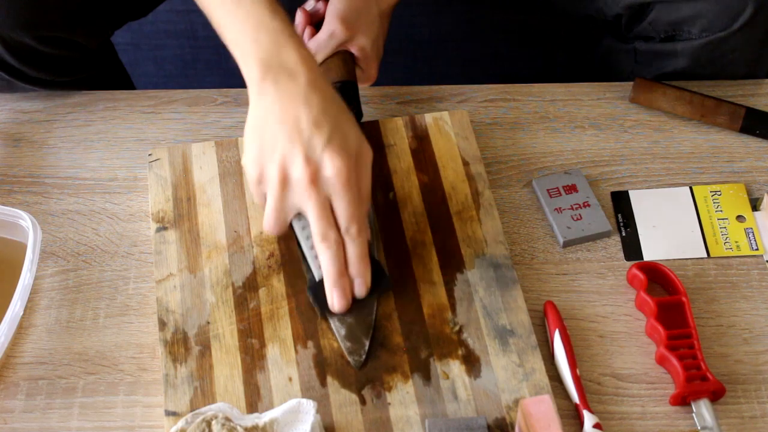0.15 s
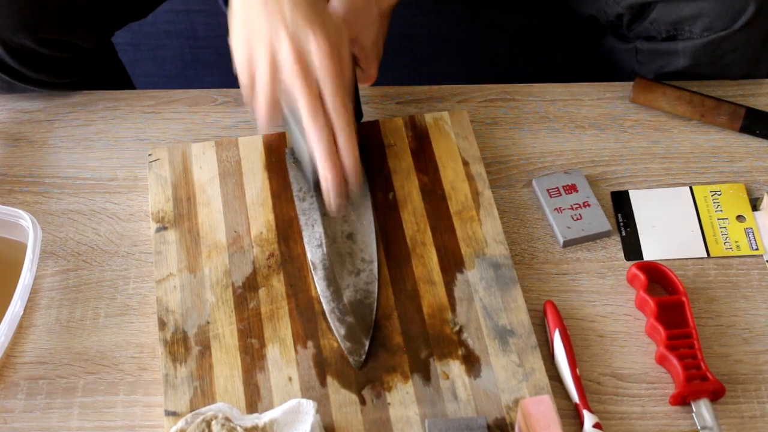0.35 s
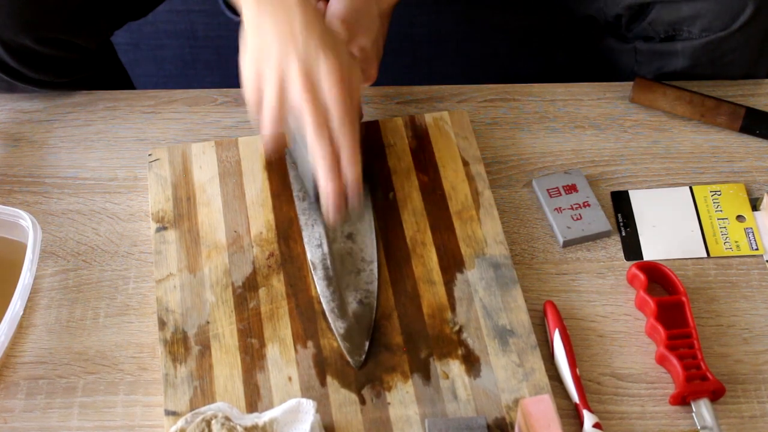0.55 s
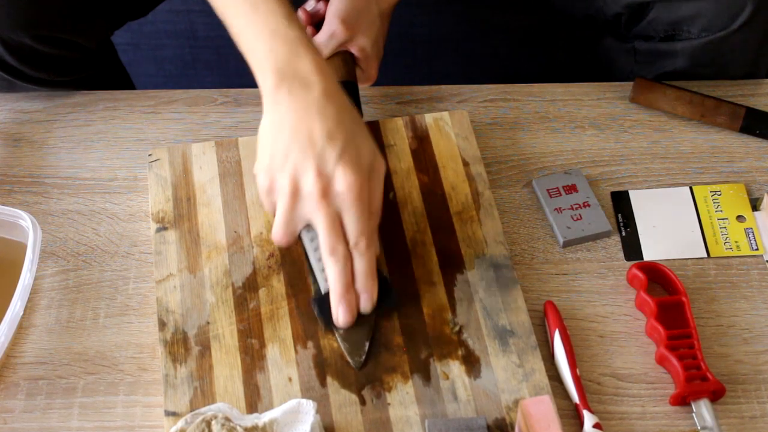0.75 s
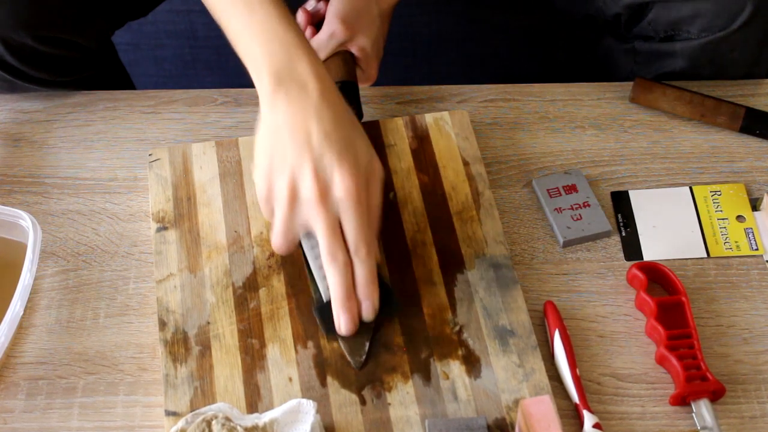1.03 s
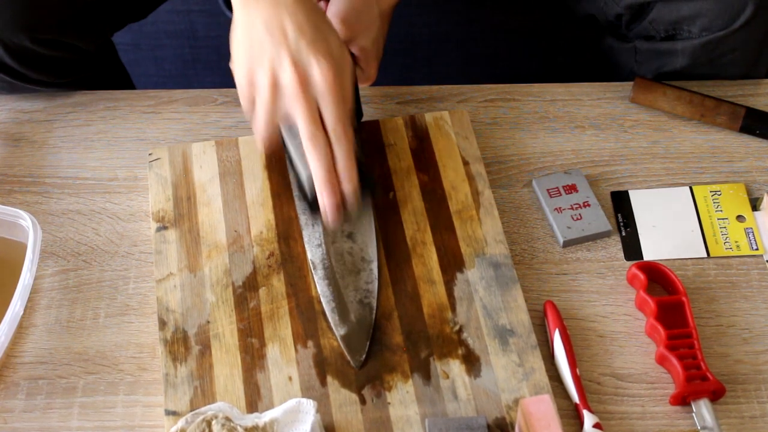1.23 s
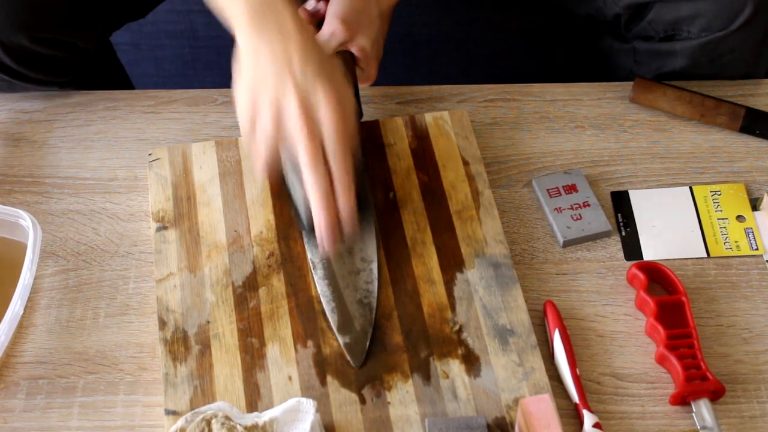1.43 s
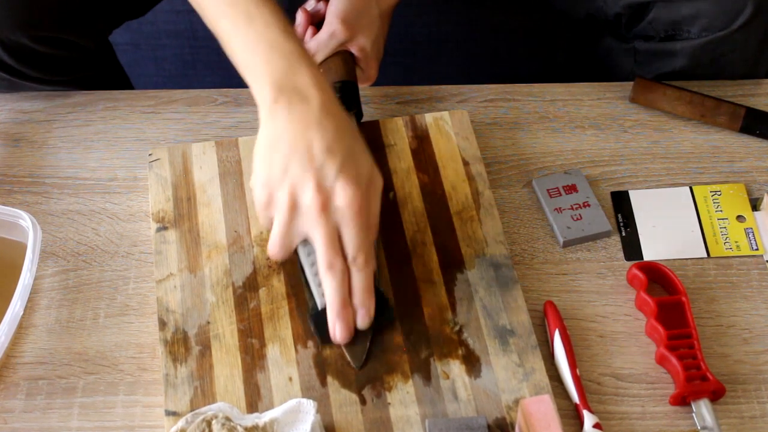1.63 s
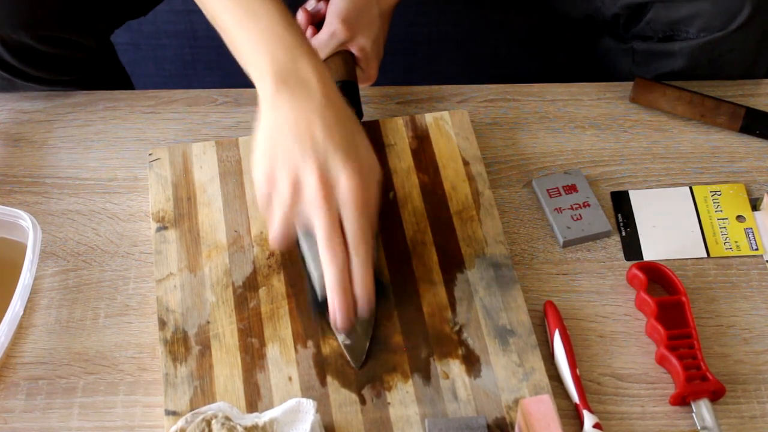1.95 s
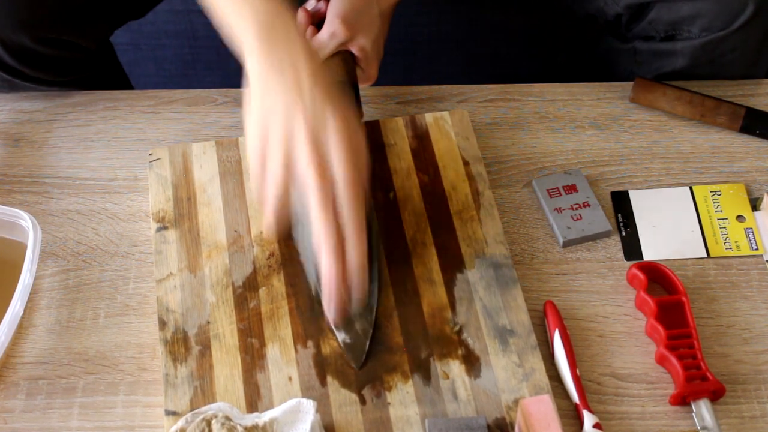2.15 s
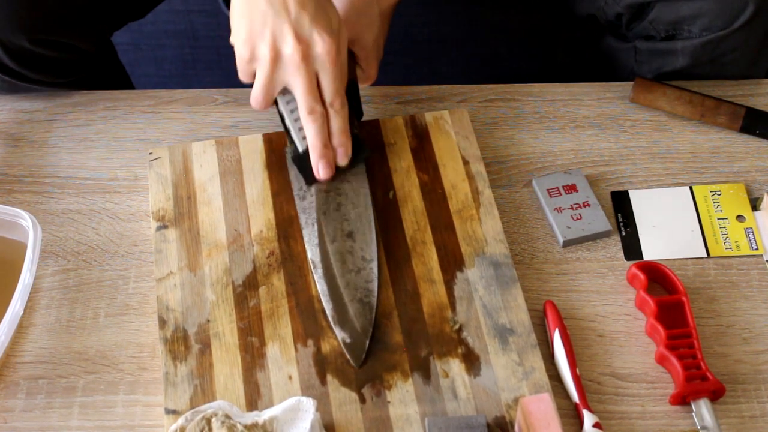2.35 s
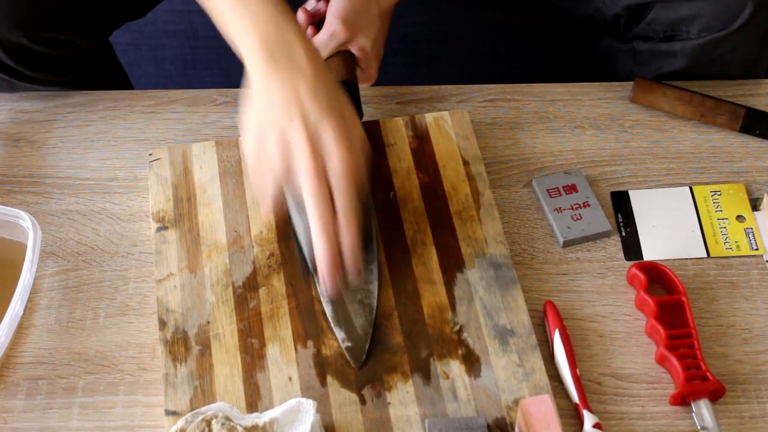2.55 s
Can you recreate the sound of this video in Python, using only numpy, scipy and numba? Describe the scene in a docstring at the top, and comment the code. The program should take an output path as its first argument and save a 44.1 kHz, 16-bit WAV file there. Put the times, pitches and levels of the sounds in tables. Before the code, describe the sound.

Sanding pad scrubs rapidly back and forth on a rusty steel blade over a wooden board

```python
"""In a small room, a sanding pad scrubs to and fro along a rusty steel blade on a wooden board, heard up close.
Dense grit clicks make the blade ring; the place of the pad decides which resonances are loud.
The board rumbles along and thuds, mostly at the turns: short pushes and noise ring its modes.
A faint echo (fading noise) follows the scrub, and low, steady noise lies underneath."""
import sys
import numpy as np
from scipy import signal
from scipy.fft import rfft, irfft
from scipy.io import wavfile
from scipy.ndimage import uniform_filter1d
from numba import njit

SR = 44100
rng = np.random.default_rng(int(sys.argv[2]) if len(sys.argv) > 2 else 0)


def store_wav(level_fs):
    """Save 16-bit WAV to argv[1]."""
    pcm = np.round(np.clip(np.atleast_2d(level_fs), -1, 1) * 32767)
    wavfile.write(sys.argv[1], SR, pcm.T.astype(np.int16))


N = 119070  # length in samples

# Strokes of the pad, in turn back to the heel and out to the tip of the blade. Columns:
# [start t/s, level/dB, treble/dB, presence/dB, rise from early to late/dB, surge midway/dB, board shake/dB]
STROKES = [(-.07, -22, 3.5, 2, 2, 0.5, 1.5), (.071, -19, -0.5, 3, 0, 2.5, 4),
           (.219, -21.5, 3.5, 0.5, 4, -0.5, 4), (0.371, -22, 3, 4.5, -4, 1, 3.5),
           (0.528, -22, 4.5, 2, 5.5, 0, 1), (.672, -20, 2.5, 4.5, -1.5, 2, 6),
           (0.822, -20.5, 4, 0.5, 4, 0, 3), (.969, -20.5, 3, 3, -1.5, 2.5, 3.5),
           (1.129, -20.5, 1, 0.5, 1.5, 1, -2), (1.268, -19, -0.5, 2.5, 0, 0.5, 3.5),
           (1.411, -21, 3.5, 1, 0.5, -0.5, 3.5), (1.558, -18.5, -1, 2.5, -4.5, 0.5, 5),
           (1.703, -20.5, 1.5, 1.5, 4, -1.5, 2.5), (1.853, -19, 1, 2.5, -4.5, 0, 4),
           (1.994, -21, 2, 2.5, 3, -1, 4.5), (2.138, -19, 1, 2.5, -5.5, 1, 4.5),
           (2.279, -21.5, 3, 1.5, 4.5, -0.5, 4.5), (2.421, -20, 3, 2, -4, 1, 2),
           (2.561, -22.5, 6.5, 0, 3.5, 0, 5.5)]
# Resonances of blade and pad, gains relative to each other. Columns:
# [f/Hz, width/Hz, level with the pad at the heel/dB, level midway/dB, level at the tip/dB]
BLADE = [(972, 510, -17, -24.5, -11), (1487, 390, -25.5, -23, -6.5), (1924, 254, -8.5, -7.5, -2.5),
         (2467, 397, -3.5, -5, 2), (3119, 430, 0.5, 0, 2.5), (3457, 450, -4, -2, 3.5),
         (4058, 546, -3.5, -1, 3.5), (4885, 450, -6.5, -7.5, -1), (5485, 1700, -8.5, -5.5, 1),
         (6895, 1030, -4.5, -6.5, -3.5), (7690, 1520, -5.5, -4, 0), (9670, 3250, -6, -4.5, -6),
         (11180, 2200, -7, -5.5, -4.5), (13520, 8400, -6, -3.5, -7.5)]
# Thuds of the board, before the levels of its modes. A delay below zero counts as none. Columns:
# [t/s, low modes level/dB, upper modes level/dB, centre of the upper modes that ring f/Hz, low modes delay/ms]
THUDS = [(0.072, -19.5, -18.5, 264, 7.5), (.216, -32, -32, 300, 0.5), (0.374, -18, -16, 259, 11.5),
         (.432, -40, -27, 320, 3), (0.524, -32.5, -33, 310, 8.5), (0.678, -30, -21.5, 340, 2),
         (0.815, -35, -32, 300, 0), (0.974, -19, -15.5, 330, 10), (1.028, -38, -28, 330, 1),
         (1.055, -34, -42, 250, -1.5), (1.122, -33, -39.5, 250, 0), (1.266, -25.5, -31, 250, 5),
         (1.41, -31, -28, 300, 1.5), (1.563, -27.5, -21.5, 365, 1), (1.628, -30, -28, 350, -5),
         (1.701, -33.5, -51, 330, 1.5), (1.854, -28, -21, 367, 2.5), (2.14, -24, -20.5, 386, -0.5),
         (2.209, -29, -28, 310, 0), (2.423, -28, -28.5, 350, 1), (2.493, -29.5, -25, 445, 0.5)]
# Ringing modes of board and table. Columns: [f/Hz, level/dB, time to fade by 60 dB t/s]
BOARD = [(72, -10.5, 0.18), (129.2, -1, 0.23), (144, 1.5, 0.14), (190, -2.5, 0.066), (282, -8, 0.12),
         (341.8, -7, 0.1), (452, -4, 0.076), (519, -8.5, 0.096), (554, -16, 0.14)]
# Colour of the room noise, only the shape counts. Columns: [f/Hz, level per Hz/dB]
ROOM_NOISE = [(18, -11), (40, 1.5), (58, -13), (75, -3.5), (95, 3), (200, -10), (450, -3.5), (700, -27.5),
              (1300, 0.5)]

# Hand: share of full speed where the grit bites well (about 3/4), when (leaving, reaching) each end
BITE_HEEL, BITE_TIP = (0.29, 0.45), (0.5, 0.6)
CREEP = 0.11  # share of full speed left at the turns: the pad never quite stops
RETURN_TREBLE_SWELL_DB, PUSH_TREBLE_SWELL_DB = 1.5, 2.5  # treble grows through a stroke
PRESENCE_SURGE = 1  # presence is zero at the turns and peaks midway through a stroke
# Grit: clicks per second at full bite, and how much click sizes vary
GRIT_PER_S, GRIT_SPREAD_DB, GRIT_MAX_DB = 10000, 2, 6.5
OWN_GRIT_DB = 0  # each resonance's own grit, next to the shared grit
# Blade: loudness follows the bite more steeply, and a little later, in the treble
SPEED_POWER_LOW, SPEED_POWER_HIGH, TREBLE_LAG_S = 0.9, 1.3, 0.0038
FLICKER_DB, SHARED_FLICKER_DB = 1.67, 0.6  # random level: each resonance alone, all together
DRIFT = 0.015  # random wander of each resonance, as a share of its frequency
PRESENCE_HZ, PRESENCE_OCTAVES = 6050, 0.28  # boosted band with the pad midway
PRESENCE_FALL_OCTAVES = 0.4  # the band falls this far from heel to tip
# Board: the table under it takes up a blow slowly
PUSH_S, THUD_DB, UPPER_OCTAVES = 0.002, -2, 0.4
SWELL_HZ, SWELL_T60_S, SWELL_DB = 135.7, 0.033, -1
RUMBLE_DB, RUMBLE_FLICKER_DB = -40.5, 2.5
# Room and top limit
ROOM_T60_S, ROOM_DB, ROOM_NOISE_DB, TOP_HZ = 0.5, -13.5, -48, 15680


def hand():
    """The pad swings like a cosine between the blade's ends; speed sets bite, each stroke sets tone and level."""
    t, rows = np.arange(N) / SR, np.array(STROKES)
    turns = np.append(rows[:, 0], 2.705)  # the last turn, in s
    run = np.interp(t, turns, np.arange(len(turns)))  # strokes done so far
    stroke = np.minimum(run.astype(int), len(rows) - 1)
    outward = stroke % 2
    place = 0.5 + 0.5 * np.cos(np.pi * run)  # 0 heel, 1 tip
    speed = np.hypot(np.sin(np.pi * run), CREEP)

    heel = np.array(BITE_HEEL)[1 - outward]
    tip = np.array(BITE_TIP)[outward]
    bite = np.tanh(speed / (heel + (tip - heel) * place))
    bite = uniform_filter1d(bite, size=150)

    smooth = uniform_filter1d(rows[stroke].T, size=600, axis=1)  # no jumps between strokes
    _, level_db, treble_db, presence_db, rise_db, surge_db, shake_db = smooth
    midway = -np.cos(2 * np.pi * run)  # -1 at the turns, 1 midway
    level_db = level_db - rise_db * np.cos(np.pi * (run - stroke)) * speed + surge_db * midway
    treble_swell_db = np.where(outward, PUSH_TREBLE_SWELL_DB, -RETURN_TREBLE_SWELL_DB)
    treble_db = treble_db + np.cos(np.pi * run) * speed * treble_swell_db
    presence_db = presence_db * (1 + PRESENCE_SURGE * midway)
    return place, bite, level_db, treble_db, presence_db, shake_db


def grit(bite):
    """Random clicks of either sign, denser as the paper bites; most are small, a few larger."""
    hit = rng.random(N) < GRIT_PER_S / SR * bite
    size_db = np.minimum(GRIT_SPREAD_DB * rng.exponential(size=N), GRIT_MAX_DB)
    sign = np.sign(rng.standard_normal(N))
    clicks = hit * sign * undb(size_db) / np.sqrt(bite)  # the root evens out the average power
    return level(clicks, 0)


def scrub(place, bite, stroke_db, treble_db, presence_db):
    """Shared grit rings all resonances together, equally fine grit each alone; the pad's place sets their gains."""
    out, shared_flicker, shared_grit = 0, walk(70), grit(bite)
    for k, (hz, width, *place_db) in enumerate(BLADE):
        high = np.clip(np.log2(hz / 3000) / 2, 0, 1)  # 0 up to 3 kHz, 1 from 12 kHz
        drive = shared_grit + undb(OWN_GRIT_DB) * grit(bite)
        centre = np.minimum(hz * (1 + DRIFT * walk(12)), SR / 2.3)
        ring = drive
        for _ in range(2):  # two wider filters in a row give about the listed width
            ring = svf(ring, centre, 1.5 * width, 1. * SR)
        ring = level(ring, 0)

        gain_db = np.interp(place, [0, .5, 1], place_db) + high * treble_db
        gain_db = gain_db + FLICKER_DB * walk(27.79) + SHARED_FLICKER_DB * shared_flicker
        octaves_off = np.log2(hz / PRESENCE_HZ) + PRESENCE_FALL_OCTAVES * (place - .5)
        gain_db = gain_db + presence_db * np.exp(-(octaves_off / PRESENCE_OCTAVES) ** 2)

        late_bite = np.interp(np.arange(N) - high * TREBLE_LAG_S * SR, np.arange(N), bite)
        power = SPEED_POWER_LOW + (SPEED_POWER_HIGH - SPEED_POWER_LOW) * high
        out = out + (-1) ** k * ring * undb(gain_db) * late_bite ** power
    return level(out, 0) * undb(stroke_db)


def thuds():
    """Soft pushes ring the modes; those up to 170 Hz get a slow swell, the upper ones a direct blow."""
    s, low_db, upper_db, upper_hz, delay_ms = np.array(THUDS).T
    low = np.zeros(N)
    low[((s + np.maximum(delay_ms, 0) / 1000) * SR).astype(int)] = undb(low_db)
    swell_scale = 2 * np.log(1000) / (SWELL_T60_S * SR)
    low = mode(low, SWELL_HZ, SWELL_T60_S) * swell_scale * undb(SWELL_DB)

    out = 0
    for k, (hz, db, t60) in enumerate(BOARD):
        octaves_off = np.log2(hz / upper_hz)
        blow_db = upper_db - 6 * (octaves_off / UPPER_OCTAVES) ** 2
        blows = np.zeros(N)
        blows[(s * SR).astype(int)] = (-1) ** k * undb(blow_db)
        out = out + undb(db + THUD_DB) * mode(blows if hz > 170 else low, hz, t60)

    push = np.hanning(int(PUSH_S * SR) + 2)  # rounds off each blow
    return signal.fftconvolve(out, push / push.sum())[:N]


def rumble(shake_db):
    """The shake of the strokes, flickering noise, rings all modes of the board."""
    shake = rng.standard_normal(N) * undb(RUMBLE_FLICKER_DB * walk(16) + shake_db)
    ringing = sum(undb(db) * mode(shake, hz, t60) for hz, db, t60 in BOARD)
    return level(ringing, RUMBLE_DB)


def room_echo(dry):
    """Echoes blur into fading noise, duller than white, that starts 4 ms after the sound."""
    t = np.arange(SR // 2) / SR
    tail = rng.standard_normal(len(t)) * undb(-60 * t / ROOM_T60_S) * (t > .004)
    tail = signal.lfilter([1], [1, -.5], tail)
    wet = signal.fftconvolve(dry, tail / np.sqrt(np.sum(tail ** 2)))[:N]
    return undb(ROOM_DB) * wet


def room_tone():
    """Low, steady noise of the room: white noise shaped by frequency."""
    hz, table = np.maximum(np.fft.rfftfreq(N, 1 / SR), 1), np.array(ROOM_NOISE)
    shape_db = np.interp(np.log(hz), np.log(table[:, 0]), table[:, 1], left=-60, right=-60)
    return level(irfft(rfft(rng.standard_normal(N)) * undb(shape_db), N), ROOM_NOISE_DB)


def undb(db):
    """Turn decibels into a factor."""
    return 10 ** (np.asarray(db) / 20)


def level(x, db):
    """Scale a sound to an average (RMS) level in dB."""
    return x * undb(db) / np.sqrt(np.mean(x ** 2))


@njit
def svf(x, hz, width, sr):
    """State-variable band-pass with a moving centre, gain 1."""
    y, band, low = np.empty(len(x)), 0., 0.
    for i in range(len(x)):
        g, k = np.tan(np.pi * hz[i] / sr), width / hz[i]
        v = (band + g * (x[i] - low)) / (1 + g * (g + k))
        band, low, y[i] = 2 * v - band, low + 2 * g * v, k * v
    return y


def walk(rate):
    """Random levels held 1 / rate s, then smoothed twice; spread near 1."""
    hold = int(SR / rate)
    steps = np.repeat(rng.standard_normal(N // hold + 1), hold)
    return 1.3 * uniform_filter1d(uniform_filter1d(steps, hold), hold)[:N]


def mode(x, hz, t60):
    """One ringing mode, fading 60 dB in t60 s; a unit impulse gives a ring of height 1."""
    r, w = np.exp(-np.log(1000) / (t60 * SR)), 2 * np.pi * hz / SR
    return signal.lfilter([.5, 0, -.5], [1, -2 * r * np.cos(w), r * r], x)


def scene():
    """Add scrub, its echo, board and room noise."""
    *controls, shake_db = hand()
    scrubbing = scrub(*controls)
    board = thuds() + rumble(shake_db)
    return (scrubbing + room_echo(scrubbing) + board + room_tone())[None]


def record(dry):
    """A steep low-pass filter cuts the top of the treble."""
    return signal.sosfilt(signal.ellip(16, .3, 75, TOP_HZ, fs=SR, output="sos"), dry)


dry = scene()
out = record(dry)
store_wav(out)
```